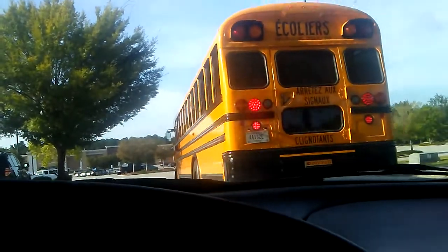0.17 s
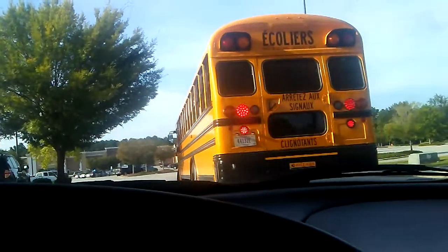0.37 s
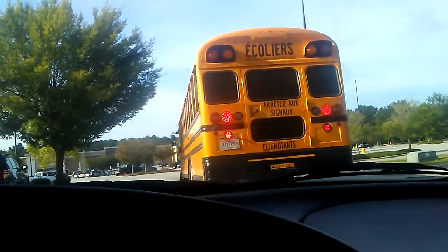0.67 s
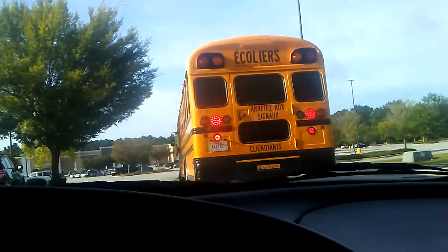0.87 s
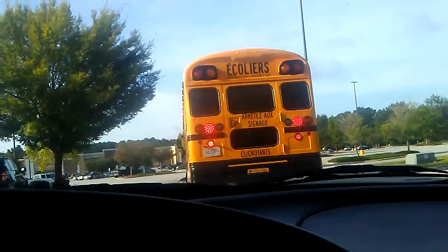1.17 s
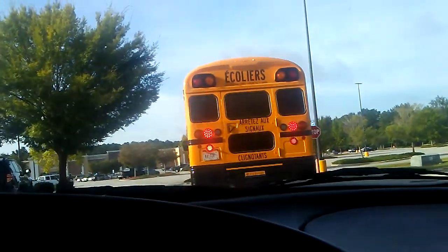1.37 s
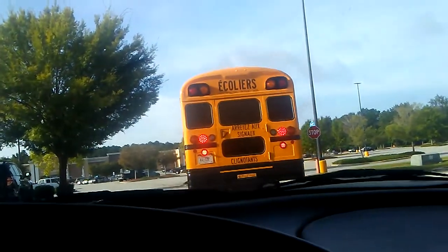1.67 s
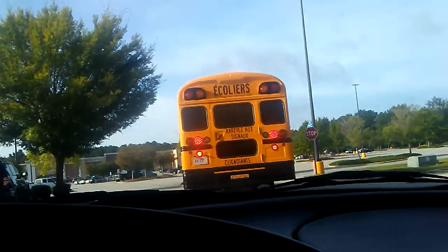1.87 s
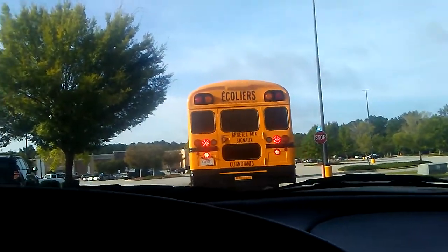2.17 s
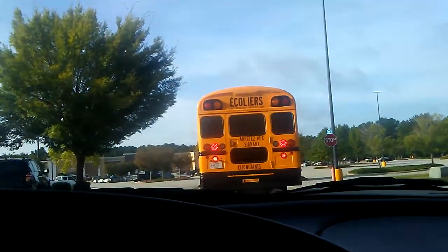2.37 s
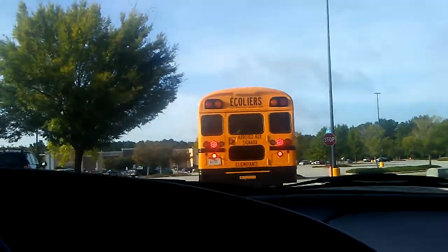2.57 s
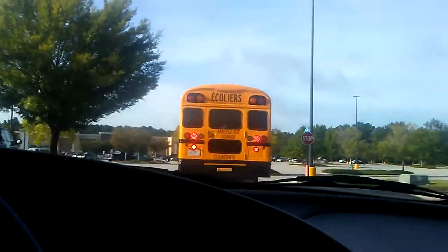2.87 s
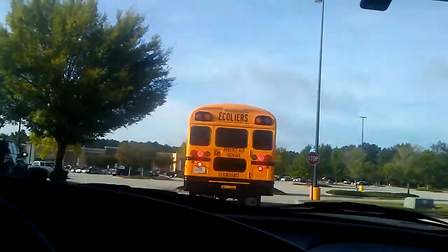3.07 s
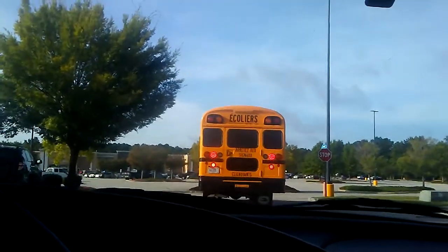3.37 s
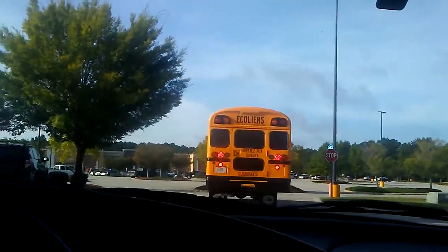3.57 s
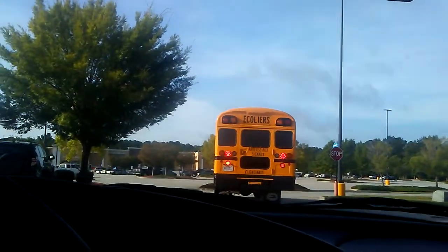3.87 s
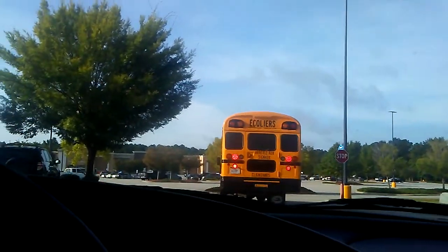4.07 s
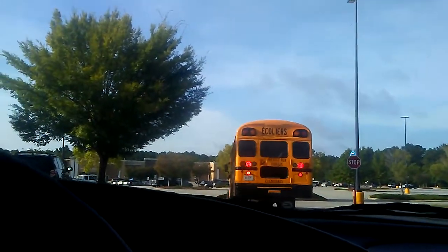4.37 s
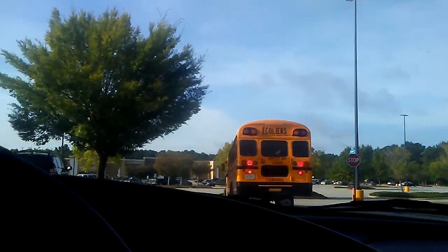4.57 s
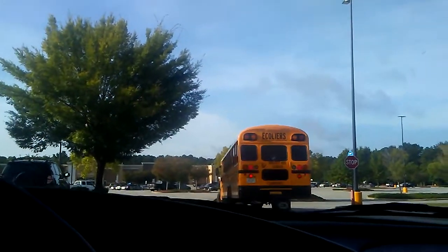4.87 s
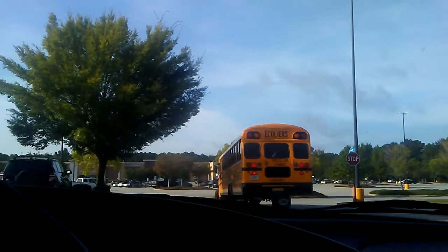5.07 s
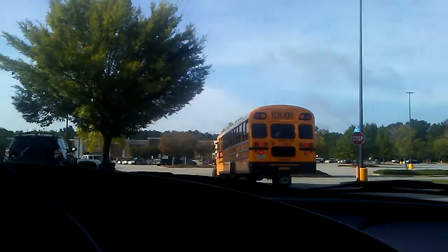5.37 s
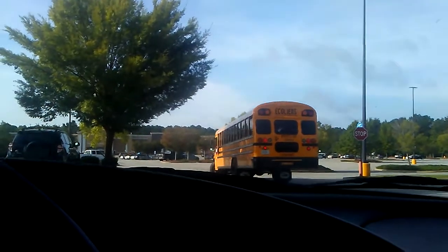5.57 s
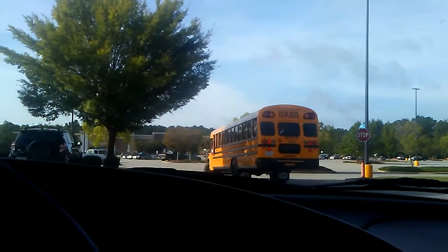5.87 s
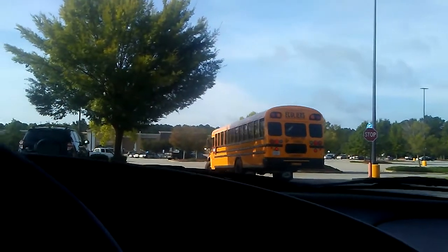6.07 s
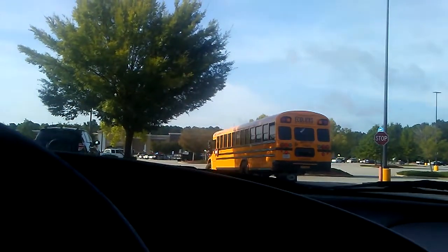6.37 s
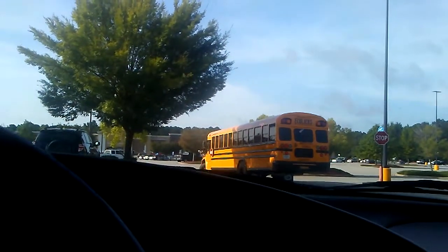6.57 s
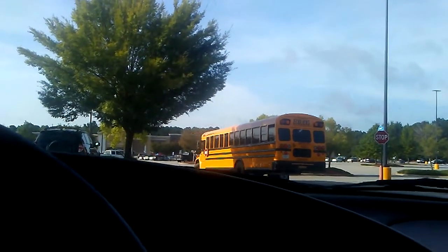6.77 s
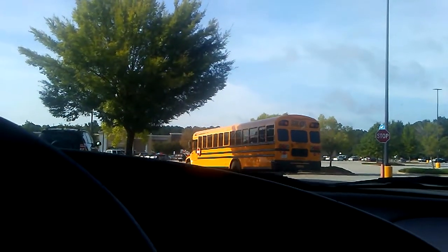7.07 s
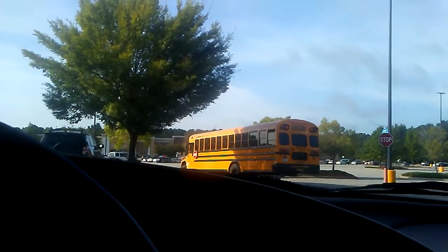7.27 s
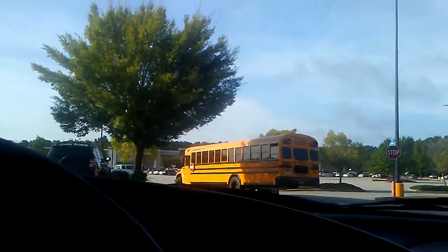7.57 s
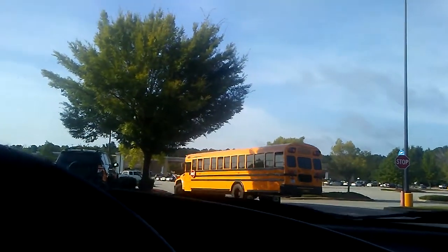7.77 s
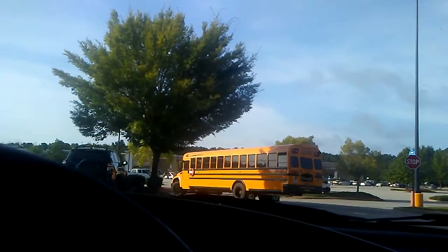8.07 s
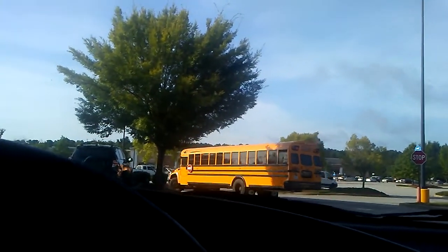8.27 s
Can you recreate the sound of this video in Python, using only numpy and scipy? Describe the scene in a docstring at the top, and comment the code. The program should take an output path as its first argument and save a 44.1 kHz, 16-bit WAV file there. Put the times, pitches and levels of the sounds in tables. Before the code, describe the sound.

Inside a car, a low engine boom wavers while a power window whines shut, door locks thump, then tyres rumble with soft thuds and a squeak.

```python
"""Slow drive inside a car

The engine booms as a low wavering tone, over noise from the tyres and low thuds of wheels and door locks.
A power window whines and its glass slides; air and insects outside fade as the car is shut.
Plastic clicks, door lock thumps and dull knocks are short blows that ring a body; a hand brushes the
steering wheel as patchy noise, and trim squeaks in falling chirps."""
import sys
import numpy as np
from scipy import signal
from scipy.fft import rfft, irfft
from scipy.io import wavfile
from scipy.ndimage import uniform_filter1d

SR = 44100
rng = np.random.default_rng(int(sys.argv[2]) if len(sys.argv) > 2 else 0)


def store_pcm(level_fs):
    """Save levels as 16-bit WAV."""
    pcm = np.round(np.clip(level_fs, -1, 1) * 32767).astype(np.int16)
    wavfile.write(sys.argv[1], SR, np.atleast_2d(pcm).T)


N = 371763
T = np.arange(N) / SR  # time in s

# resonances of the inner trim: pitch_hz, width_hz, relative_db
TRIM_RESONANCES = [(135, 60, -3), (250, 70, 4.5), (335, 55, 3), (535, 100, -4), (645, 50, 1), (707, 45, 0),
                   (791, 30, 1), (942, 34, 1), (1110, 34, 0), (1380, 90, -5), (1670, 55, 0), (1810, 45, -4),
                   (2080, 70, -4)]


def amp(db):
    """Turns decibels into gain."""
    return 10 ** (np.asarray(db) / 20)


def unit(x):
    """Scales a signal to rms 1."""
    return x / np.sqrt(np.mean(x ** 2) + 1e-20)


def curve(rows, axis=1):
    """Joins one column of a table by straight lines in time."""
    rows = np.asarray(rows)
    return np.interp(T, rows[:, 0], rows[:, axis])


def colour(points, hz):
    """Gain of a spectrum, joined by straight lines on a log-frequency axis."""
    f, db = np.transpose(points)
    return amp(np.interp(np.log(hz + 1), np.log(f + 1), db))


def wander(hz):
    """Slow random drift of rms 1 that weakens above the given rate."""
    steps = rng.standard_normal(4096)
    rates = np.fft.rfftfreq(4096, T[-1] / 4096)
    slow = irfft(rfft(steps) / (1 + (rates / hz) ** 4))
    return np.interp(T, np.linspace(0, T[-1], len(slow)), unit(slow))


def noise(points, patchy_db, size=1024):
    """Noise of rms 1 with a given spectrum and random patches in time and frequency."""
    hz = np.fft.rfftfreq(size, 1 / SR)
    real, imaginary, patches = rng.standard_normal((3, len(hz), 4 * N // size + 5))
    patches = uniform_filter1d(patches, size=8, axis=0)
    patches = unit(uniform_filter1d(patches, size=12, axis=1))
    grid = (real + 1j * imaginary) * colour(points, hz)[:, None] * amp(patchy_db * patches)
    sound = signal.istft(grid, nperseg=size, noverlap=size - size // 4)[1]
    return unit(sound[:N])


def blurred(angle, blur_hz):
    """A tone of rms 1 whose strength and phase are stirred at random."""
    return unit(wander(blur_hz) * np.sin(angle) + wander(blur_hz) * np.cos(angle))


def held(start, end, attack, release):
    """Gain that rises, holds and dies away; all times in s."""
    return np.clip((T - start) / attack, 0, 1) * np.exp(-np.maximum(T - end, 0) / release)


def hump(s, db, length):
    """Gain that swells to a peak and falls back."""
    return amp(db) / np.cosh(np.clip(2 * (T - s) / length, -50, 50))


def throb(hz, length):
    """A few soft, low cycles, centred in a fifth of a second."""
    t = T[:SR // 5] - .1
    return np.exp(-(t / length) ** 2) * np.cos(2 * np.pi * hz * t)


def modes(rows, hz):
    """Gain of a body's resonances at each frequency."""
    return np.sqrt(sum(amp(db) ** 2 / (1 + (2 * (hz - f) / width) ** 2) for f, width, db in rows))


def ringing(gain):
    """Complex response that has a body's gain, with the phase that makes it ring only after the blow."""
    log_gain = np.log(np.maximum(gain / gain.max(), 1e-4))
    mirrored = np.r_[log_gain, log_gain[-2:0:-1]]
    return np.exp(np.conj(signal.hilbert(mirrored)))[:len(gain)]


def burst(gain, t60, rise, blow, ragged_db=3):
    """A clean blow and a ragged, dying rattle of tiny impacts ring a body; its energy is 8 ms at rms 1."""
    t = T[:2 * (len(gain) - 1)]
    clumps = unit(uniform_filter1d(rng.standard_normal(len(t)), size=130))
    rattle = irfft(np.exp(2j * np.pi * rng.random(len(gain))))
    rattle = rattle * amp(ragged_db * clumps - 60 * t / t60) * (1 - np.exp(-t / rise))
    clean_blow = blow * (t == t[SR // 1000])  # one sample, 1 ms in
    force = rattle / np.linalg.norm(rattle) + clean_blow
    sound = irfft(rfft(force) * ringing(gain))
    return sound / np.linalg.norm(sound) * np.sqrt(.008 * SR)


def add(mix, s, sound):
    """Mixes a sound in at a time in s."""
    part = mix[max(round(s * SR), 0):][:len(sound)]
    part += sound[:len(part)]


def outside():
    """Noise of the open air and of shrill insects, fading unevenly as the car is shut."""
    # spectra of the air and the insects: pitch_hz, relative_db_per_hz
    air_spectrum = [(500, 15), (900, 12), (1600, 10.5), (2200, 4.5), (2800, 7), (3600, -12), (5000, -11),
                    (6000, -4), (7200, -4), (8500, -20.5), (16000, -10.5)]
    insect_spectrum = [(3500, -14), (5500, -14.5), (6800, -6.5), (7800, -4), (9500, -9), (11500, -16.5),
                       (16000, -15.5)]
    # loudness inside the car: time_s, air_db, insects_db
    levels = [(0, -53.5, -57), (.55, -54, -59), (1.0, -51.5, -51.5), (1.3, -54.5, -64),
              (1.55, -43.5, -60.5), (1.88, -53, -67.5), (2.25, -49, -69), (2.55, -61, -77),
              (2.9, -59.5, -90), (3.15, -83, -94), (8.43, -81, -98)]
    air = noise(air_spectrum, patchy_db=-0.9) * amp(curve(levels))
    return air + noise(insect_spectrum, patchy_db=2.5) * amp(curve(levels, axis=2))


def road(rumble_db=-1, roar_db=1.5, lumpy_db=2, surge_blur_hz=26):
    """Tyres rumble through the floor; uneven asphalt shakes floor, body and panel, more so with speed."""
    # unevenness of the asphalt: time_s, rumble_db (before rumble_db above is added)
    rolling = [(0, -36), (.75, -30), (1.7, -37.5), (2.1, -34.5), (2.4, -35), (3.1, -39), (3.6, -35),
               (4.3, -37), (4.7, -31), (5.1, -38), (5.65, -32), (6.75, -34), (8.43, -34)]
    # road roar that grows with speed: time_s, roar_db (before roar_db above is added)
    roar_levels = [(0, -56), (2.4, -56), (3.3, -55.5), (4.3, -55.5), (5.2, -53), (6.5, -53), (8.43, -53)]
    # spectra of floor, car body, hollow panel and roar: pitch_hz, relative_db_per_hz
    rumble_spectrum = [(10, -33), (24, -24), (32, -7), (55, 11), (70, 10.5), (88, 0), (125, 9.5), (150, -2),
                       (185, -19.5), (300, -53)]
    body_spectrum = [(100, -43), (170, 1), (230, 0), (310, -3.5), (365, -0.5), (400, -16), (520, -21),
                     (900, -70)]
    panel_spectrum = [(200, -52), (285, 5), (310, 5), (330, 2), (355, -16), (450, -60)]
    roar_spectrum = [(250, -34), (400, 4.5), (455, 5), (480, 2), (530, 5), (600, -1.5), (680, 1.5),
                     (735, -4), (800, -1), (900, 1.5), (970, -3), (1090, -3.5), (1140, -10.5),
                     (1650, -12.5), (2050, -17.5), (2700, -18), (3200, -23.5), (4050, -22.5), (4800, -27),
                     (7000, -28), (10500, -39), (16000, -51)]
    # strongest surges of the panel's hum: peak_s, level_db, pitch_hz
    surges = [(5.061, -46.5, 271), (5.65, -46.5, 313), (6.18, -42.5, 343), (6.52, -42.5, 320),
              (6.859, -42.5, 328), (7.31, -51, 360), (8.07, -39, 314.2), (8.29, -43.5, 275.5)]

    uneven, speed_db = curve(rolling), curve(roar_levels)
    slower_db = speed_db - speed_db[-1]  # 0 at the final speed
    rumble = noise(rumble_spectrum, patchy_db=-0.14, size=4096) * amp(uneven + rumble_db)

    # the body follows the rumble (0.14 dB per dB) and the roar (0.65 dB per dB)
    shaking = amp(-45 + 0.14 * (uneven - uneven.mean()) + 0.65 * slower_db)
    coarse_stretch = hump(5.14, -61, 0.26)
    body = noise(body_spectrum, patchy_db=0.5, size=4096) * (shaking + coarse_stretch)

    # the hollow panel follows the roar at 2.1 dB per dB, unsteady by 4 dB
    hum = amp(-58 + 2.1 * slower_db + 4 * wander(6.7))
    panel = noise(panel_spectrum, patchy_db=-1.5, size=4096) * hum
    for s, db, hz in surges:
        panel += hump(s, db, 0.079) * blurred(2 * np.pi * hz * T, surge_blur_hz)

    roar = noise(roar_spectrum, patchy_db=2.5, size=2048) * amp(speed_db + roar_db)
    return (rumble + body + panel) * amp(lumpy_db * wander(18.0)) + roar


def jolts(hz=110, length=0.006):
    """Small stones and cracks give short throbs at random."""
    jolts_per_s, typical_peak_db = 24, -30.5
    hits = (rng.random(N) < jolts_per_s / SR) * rng.standard_normal(N)
    return amp(typical_peak_db) * signal.oaconvolve(hits, throb(hz, length), "same")


def engine(boom_db=-0.6, shake=0.3, sway_db=-40.0, sway_hz=9):
    """A low boom at the firing rate; a stirred part makes it throb unevenly when weak, under faint drones."""
    # engine speed and boom: time_s, firing_rate_hz, boom_db (before boom_db above is added)
    firing = [(0, 45.45, -27.5), (0.7, 45.57, -27.5), (1.35, 44.31, -28), (1.95, 43.47, -25),
              (2.3, 42.85, -26), (2.55, 45.09, -32), (3.1, 45.02, -39), (4.1, 44.75, -39.5),
              (4.7, 45.25, -33), (6.2, 44.69, -31.5), (6.8, 45.7, -29.5), (7.7, 45.6, -40.5),
              (8.1, 43.74, -28)]
    # cabin drones that come and go: start_s, end_s, pitch_hz, blur_hz, level_db
    drones = [(0, 8.43, 67, 9.3, -37), (0, 2.36, 118, 4, -44), (2.3, 7.6, 171.4, 4.4, -51),
              (2.4, 7.8, 362.2, 12.4, -58), (2.35, 3.0, 785, 15, -66), (2.4, 3.15, 896, 33, -67),
              (4.6, 8.43, 228, 4, -59)]
    angle = 2 * np.pi * np.cumsum(curve(firing)) / SR
    boom = unit(np.sin(angle)) * amp(curve(firing, axis=2) + boom_db) * (1 + shake * wander(36))
    boom += amp(sway_db) * blurred(angle, sway_hz)
    for start, end, hz, blur_hz, db in drones:
        fade = np.clip(np.minimum(T - start, end - T) / 0.11, 0, 1)
        boom += fade * amp(db) * blurred(2 * np.pi * hz * T, blur_hz)
    return boom


def low_thuds():
    """Low thuds of wheels over seams and of the door locks' thumps ring the cabin's lowest resonance."""
    # low thuds: centre_s, peak_db (before the cabin's ring), pitch_hz, half_length_s
    thud_rows = [(0.184, -12.5, 97, 0.0045), (0.332, -17.5, 93.5, 0.0069), (0.683, -27.5, 59, 0.029),
                 (1.585, -20.5, 112, 0.0044), (2.025, -29, 124, 0.014), (2.044, -17, 99, 0.0043),
                 (2.075, -35, 124, .006), (2.76, -30.5, 127, 0.038), (3.315, -13.5, 81.5, 0.0066),
                 (3.53, -25.5, 120.5, 0.025), (3.593, -28, 108.5, 0.0063), (3.904, -22, 110, 0.0083),
                 (4.032, -26, 131, 0.025), (4.628, -27, 113, 0.0082), (4.788, -20, 67, 0.016),
                 (4.803, -25, 111, 0.021), (5.196, -21, 114, 0.0059), (5.452, -30.5, 106, 0.014),
                 (5.61, -24, 107, 0.012), (5.672, -25, 103, 0.015), (6.021, -29.5, 112, 0.017),
                 (6.226, -15.5, 75.2, 0.0074), (6.682, -18, 126, 0.004), (6.699, -16.5, 70, 0.0095),
                 (6.724, -19.5, 102, 0.014), (6.766, -23, 122, .016), (6.855, -23, 101, 0.0092),
                 (6.903, -34, 65.4, 0.03), (7.032, -21.5, 71, 0.021), (7.273, -24, 79, 0.017),
                 (7.693, -24.5, 133, 0.011)]
    ring_hz, ring_t60_s, ring_db = 47.4, 0.29, 8
    out, t = np.zeros(N), T[:SR // 2]
    for s, db, hz, length in thud_rows:
        add(out, s - .1, amp(db) * throb(hz, length))  # a throb peaks 0.1 s in
    decay = amp(-60 * t / ring_t60_s)
    ring = 2 * decay * np.cos(2 * np.pi * ring_hz * t) / decay.sum()
    return out + amp(ring_db) * signal.oaconvolve(out, ring)[:N]


def catches(smooth=1.0):
    """Fluttering gain of skin that sticks and slips: random kicks, each dying away."""
    catches_per_s, catch_s = 140, 0.0054
    slips = (rng.random(N) < catches_per_s / SR) * rng.random(N)
    return unit(smooth + signal.lfilter([1], [1, -np.exp(-1 / (catch_s * SR))], slips))


def rubbing():
    """A hand makes light grainy strokes over the wheel rim, a faint long glide and one dry scuff."""
    # spectra of the brushing hand and the scuff: pitch_hz, relative_db_per_hz
    brush_spectrum = [(1470, -37), (2500, -9), (3300, -5.5), (4050, -3.5), (4750, -7), (5700, -4.5),
                      (6500, -3), (7680, -2), (9500, -6.5), (12200, -13), (15500, -13)]
    scuff_spectrum = [(710, -35), (1200, -18), (1510, -9), (1850, -17), (2170, 6), (2440, 1), (2800, 12.5),
                      (3100, 2), (3550, 0), (3850, -27), (4500, -26), (5850, -40), (9900, -70)]
    # strokes that swell and are let go: peak_s, level_db, swell_s, release_s
    stroke_rows = [(2.024, -50.5, 0.054, 0.059), (2.99, -65, 0.073, 0.11), (3.276, -58, 0.025, 0.072),
                   (3.535, -55, 0.098, 0.026), (3.694, -57, 0.078, 0.055), (4.06, -68, 0.073, 0.023),
                   (4.23, -61.5, 0.12, 0.084)]
    touch = amp(-68) * held(2.92, 3.93, 0.033, 0.59)  # the hand rests lightly on the rim
    glide = amp(-76.5) * np.clip((T - 5.4) / 0.29, 0, 1)  # then the rim glides on through the hand
    pushes = np.zeros(N)
    for s, db, swell, release in stroke_rows:
        before, after = np.minimum(T - s, 0), np.maximum(T - s, 0)
        pushes += amp(db) * np.exp(-(before / swell) ** 2 - after / release)
    strokes = noise(brush_spectrum, patchy_db=3.0) * (touch + glide)
    strokes += noise(brush_spectrum, patchy_db=0.5, size=512) * pushes * catches()
    scuff = noise(scuff_spectrum, patchy_db=1.5, size=512) * amp(-51) * held(2.124, 2.292, 0.039, 0.082)
    return strokes + scuff


def squeaks():
    """Trim sticks and slips in short, slightly rough, falling chirps."""
    # squeaks: start_s, relative_db, settled_pitch_hz, t60_s (time to fall by 60 dB)
    chirps = [(5.2, -49, 4050, .03), (6.1905, -38, 4050, .012), (6.2105, -14.5, 4010, .012),
              (6.2195, -28, 4010, .012)]
    sharp_share, settle_s = .15, .004  # each starts sharp and settles
    out, t = np.zeros(N), T[:SR // 10]
    low_pass = signal.butter(3, 250, fs=SR, output="sos")
    for s, db, hz, t60 in chirps:
        grit = .35 * unit(signal.sosfilt(low_pass, rng.standard_normal(len(t))))  # phase shake, radians
        turns = np.cumsum(hz * (1 + sharp_share * np.exp(-t / settle_s))) / SR
        level = amp(db - 60 * t / t60) * (1 - np.exp(-t / .003)) ** 3
        add(out, s, 3 * level * np.sin(2 * np.pi * turns + grit))
    return out


def knocks(rows, resonances, rise=0.0019, size=8192):
    """Dull blows ring a hollow body; each has its own upper edge, decay and hardness."""
    out, hz = np.zeros(N), np.fft.rfftfreq(size, 1 / SR)
    body = modes(resonances, hz)
    for s, db, edge_hz, t60, blow in rows:
        add(out, s, amp(db) * burst(body / (1 + (hz / edge_hz) ** 2.6), t60, rise, blow))
    return out


def dull_knocks():
    """Dull knocks on the door and trim, and the duller upper ring of two bumps."""
    # knocks and bump rings: start_s, level_db, upper_edge_hz, t60_s, hardness (share of the clean first blow)
    knock_rows = [(.183, -29, 220, 0.078, .5), (.622, -34.5, 1500, 0.077, 0.6),
                  (0.655, -27.5, 1800, 0.051, 0.8), (.661, -28, 1900, 0.059, 0.6),
                  (.668, -29, 1400, 0.039, 0.9), (.697, -28.5, 1020, 0.057, 0.8),
                  (.709, -29, 520, 0.14, 0.4), (0.743, -32, 1210, 0.08, 1), (1.584, -32, 654, 0.04, 0.8),
                  (1.63, -29, 2600, 0.23, 0.35), (2.909, -34, 279, 0.11, 0.9),
                  (3.855, -47, 1640, 0.074, 0.2), (4.458, -44.5, 1110, 0.064, 0.71)]
    return knocks(knock_rows, TRIM_RESONANCES)


def clicks(rows, resonances, level_db=-9, low_edge_hz=1000, high_edge_hz=15500, steepness=3.16,
           rise=0.00039, blow=0.19, size=8192):
    """Hard parts snap home: a lower clack and a bright snap, mixed anew for each blow, ring a body."""
    clack_edge_hz, snap_octaves = 2270, 0.74
    out, hz = np.zeros(N), np.fft.rfftfreq(size, 1 / SR)
    low_cut = hz ** 4 / (hz ** 4 + low_edge_hz ** 4)
    body = modes(resonances, hz) * low_cut / (1 + (hz / high_edge_hz) ** 10)
    clack = 1 / (1 + (hz / clack_edge_hz) ** steepness)
    for s, db, snap_db, snap_hz, t60 in rows:
        snap = amp(snap_db) * np.exp(-(np.log2((hz + 1) / snap_hz) / snap_octaves) ** 2)
        add(out, s, amp(db + level_db) * burst((clack + snap) * body, t60, rise, blow))
    return out


def plastic_clicks():
    """Plastic controls click and ring their own small parts."""
    # clicks: start_s, relative_db, snap_share_db, snap_pitch_hz, t60_s
    click_rows = [(0.5906, -20, -6.5, 7260, 0.055), (.608, -33, -28, 5000, 0.045),
                  (0.6548, -23.5, -15, 6800, 0.073), (0.696, -28.5, -2, 7100, 0.092),
                  (0.737, -26, -41, 5000, 0.094), (0.777, -39, 5, 7460, 0.077),
                  (0.8638, -31.5, -15, 4620, 0.067), (1.581, -28, -12, 5580, 0.079),
                  (1.629, -20, -11.5, 4200, 0.048), (1.635, -22, -19, 4000, 0.037),
                  (1.67, -33.5, 10, 7200, 0.048), (1.734, -35.5, 6, 7440, 0.062),
                  (2.2214, -34, -9.5, 7220, 0.036)]
    # resonances of the plastic: pitch_hz, width_hz, relative_db
    plastic = [(1090, 130, 1), (1400, 170, 4.5), (1640, 96, 8.5), (2180, 470, 7.5), (2590, 190, 4),
               (3166, 280, 7), (3500, 180, 6), (4130, 810, 3.5), (4950, 530, -1.5), (6400, 560, 1.5),
               (7300, 320, 0), (8740, 900, -9), (10900, 4000, -6.5)]
    return clicks(click_rows, plastic)


def column_ticks():
    """The steering column ticks as the wheel turns."""
    # ticks: start_s, relative_db, snap_share_db, snap_pitch_hz, t60_s
    tick_rows = [(2.963, -40, 16, 11800, 0.022), (2.9995, -44, 3, 8600, 0.093),
                 (3.237, -39, -3, 7000, 0.037), (3.2425, -32.5, -1, 7180, 0.079),
                 (3.6515, -24.5, 16, 6250, 0.02), (3.6743, -36.5, 2, 7000, 0.064)]
    # resonances of the column: pitch_hz, width_hz, relative_db
    column = [(1328, 35, 10), (1550, 50, 11), (2115, 69, 10), (2760, 140, 7.5), (3400, 260, 8),
              (4010, 200, 1), (4750, 260, 0), (5930, 450, -1), (7000, 700, -5), (8230, 400, -7.5),
              (9300, 720, -6.5), (11500, 3000, -10.5)]
    return clicks(tick_rows, column)


def door_locks():
    """A switch snaps, then the locks thump home twice, each a quick run of blows on the hollow door."""
    # switch snap: start_s, relative_db, snap_share_db, snap_pitch_hz, t60_s
    snap_rows = [(1.9495, -16.5, -5.5, 6750, 0.045)]
    # lock thumps: start_s, level_db, upper_edge_hz, t60_s, hardness (share of the clean first blow)
    thump_rows = [(2.0128, -16.5, 450, 0.043, 0.62), (2.0225, -20.5, 430, 0.05, 0.81),
                  (2.032, -28.5, 700, 0.037, 0.4), (2.052, -37, 480, 0.08, 0.2),
                  (2.0725, -19.5, 900, 0.04, 0.7), (2.079, -23.5, 1200, 0.028, 0.4),
                  (2.087, -30, 1050, 0.03, 0.32)]
    # resonances of the switch and the door: pitch_hz, width_hz, relative_db
    switch = [(1100, 110, -4), (1560, 90, -2), (2190, 230, 11), (3000, 130, 15), (4230, 110, 5),
              (5820, 200, 4), (6240, 230, 4), (6920, 220, 2), (7550, 200, 0), (8800, 400, -6)]
    door = [(145, 50, 4), (250, 50, 7.5), (332, 35, 0), (555, 85, 0), (690, 60, 1), (805, 60, -1.5),
            (955, 80, 1), (1100, 35, -10), (1360, 45, -12), (1510, 55, -8), (1685, 60, -11)]
    return clicks(snap_rows, switch, blow=0.36) + knocks(thump_rows, door)


def chatter(size=8192):
    """Loose window glass ticks densely against its channel as it breaks free, and rings the trim."""
    # weighting of the trim's ring: pitch_hz, relative_db
    weighting = [(250, -32), (600, 3), (1100, 5), (1800, -4), (3000, 2), (8000, 13), (16000, -17)]
    ticks_per_s = 190
    hz = np.fft.rfftfreq(size, 1 / SR)
    ticks = unit((rng.random(N) < ticks_per_s / SR) * rng.standard_normal(N))
    ring = irfft(ringing(modes(TRIM_RESONANCES, hz) * colour(weighting, hz)))
    swell = hump(0.663, -35.5, 0.051)
    return signal.oaconvolve(ticks * swell, ring / np.linalg.norm(ring))[:N]


def window(flutter=0.0036, judder=0.15, blur_hz=22):
    """The motor whines roughly and slows under load; the glass slides, juddering once a shaft turn."""
    # motor slowing under load: time_s, shaft_rate_hz (before flutter)
    shaft = [(.65, 99.5), (.95, 95.2), (1.13, 86.8), (1.58, 87.5), (1.8, 70)]
    # overtones of the whine: multiple_of_shaft_rate, relative_db
    orders = [(3, -1), (4, -10), (5, -2.5), (7, -11), (8, -10), (9, -10), (10, -2.5), (11, -18), (17, -17),
              (19, -15), (20, -13.5), (26, -16)]
    # glass in its channel: pitch_hz, relative_db_per_hz
    slide_spectrum = [(300, -26), (450, 5), (560, -4), (680, 3.5), (800, 5.5), (1080, -13.5), (1350, -9),
                      (1700, -7), (2100, -8.5), (3100, -5.5), (4200, -16.5), (7000, -16.5), (10900, -35),
                      (15000, -35)]
    on_s, off_s, spin_up_s, run_down_s = 0.587, 1.574, 0.021, 0.1
    whine_db, glass_db, roughness = -44, -47.5, .38
    breakaway_db, breakaway_s = 10.5, 0.087  # extra drag as the glass breaks free, dying away

    angle = 2 * np.pi * np.cumsum(curve(shaft) * (1 + flutter * wander(31))) / SR
    whine = np.zeros(N)
    for k, db in orders:
        tone = unit(np.sin(k * angle + 2 * np.pi * rng.random()))
        whine += amp(db) * (tone + roughness * blurred(k * angle, blur_hz))
    slide = noise(slide_spectrum, patchy_db=1.6) * (1 + judder * np.sin(angle))
    drag_db = breakaway_db * np.exp(-np.maximum(T - on_s, 0) / breakaway_s)
    moving = amp(whine_db) * unit(whine) + amp(glass_db + drag_db) * slide
    return moving * held(on_s, off_s, spin_up_s, run_down_s)


def cabin(x, t60=0.076, wet_db=-11):
    """Adds close reflections from the glass, soon soaked up by the seats, as random echoes after 3 ms."""
    t = T[:SR // 4]
    signs = rng.choice([-1., 1.], len(t))
    chosen = (rng.random(len(t)) < 2000 / SR) * (t > .003)  # about 2000 echoes a second
    taps = signs * chosen * amp(-60 * t / t60)
    return x + amp(wet_db) * signal.oaconvolve(x, taps / np.linalg.norm(taps))[:N]


def scene():
    """Everything heard from the driver's seat."""
    low_sounds = engine() + road() + jolts() + low_thuds()
    hits = plastic_clicks() + column_ticks() + dull_knocks() + chatter() + door_locks()
    handling = window() + rubbing() + cabin(hits) + cabin(squeaks(), t60=0.13, wet_db=-13.5)
    return (low_sounds + outside() + handling)[None]


def record(dry, hiss_db=-82, low_cut_hz=27):
    """The microphone drops the deepest bass and adds hiss; then the highest treble is cut off."""
    treble_edge_hz = 15850
    hz = np.fft.rfftfreq(N, 1 / SR)
    wet = irfft(rfft(dry) * hz ** 6 / (hz ** 6 + low_cut_hz ** 6), N)
    wet = wet + amp(hiss_db) * rng.standard_normal(dry.shape)
    band_limit = signal.firwin(511, treble_edge_hz, window=("kaiser", 9), fs=SR)
    return signal.oaconvolve(wet, band_limit[None], "same")


dry = scene()
out = record(dry)
store_pcm(out)
```